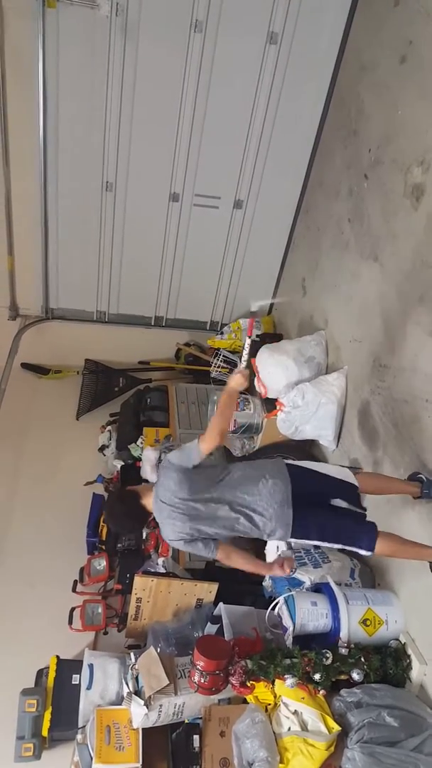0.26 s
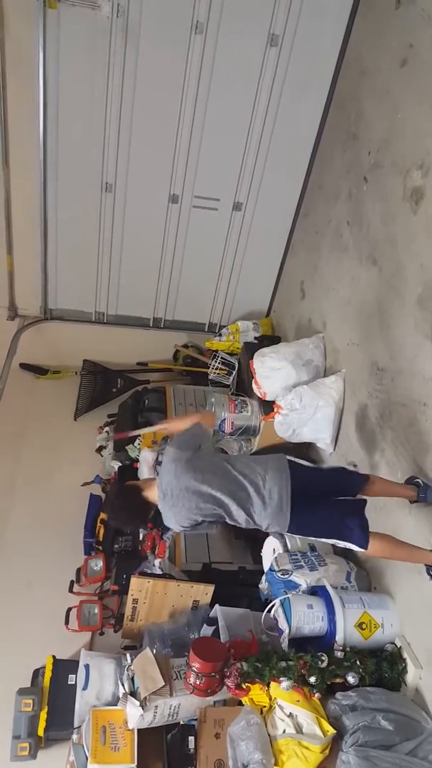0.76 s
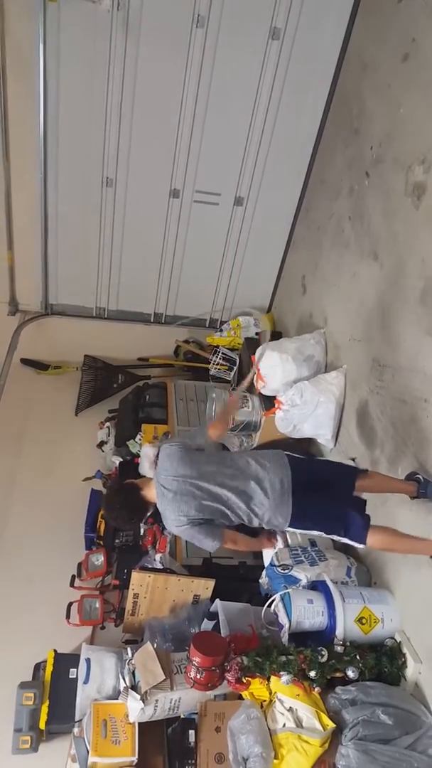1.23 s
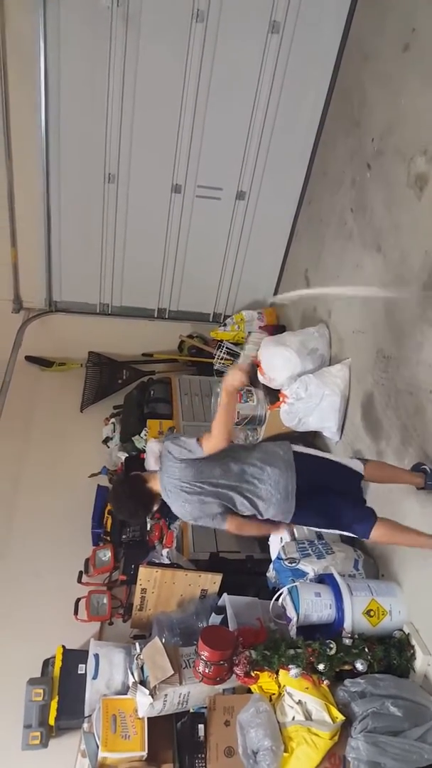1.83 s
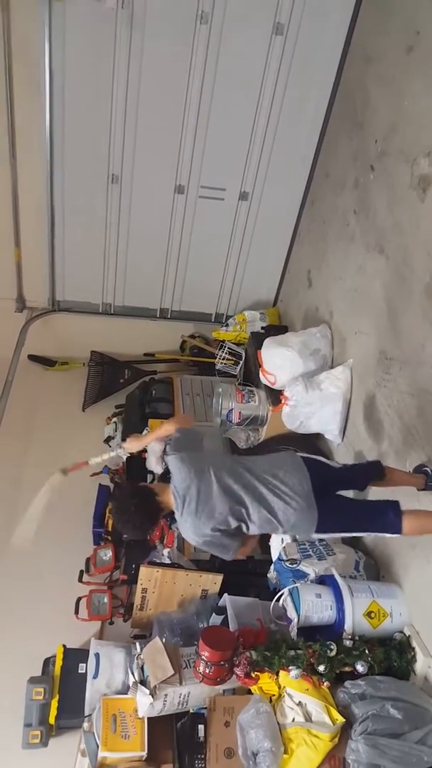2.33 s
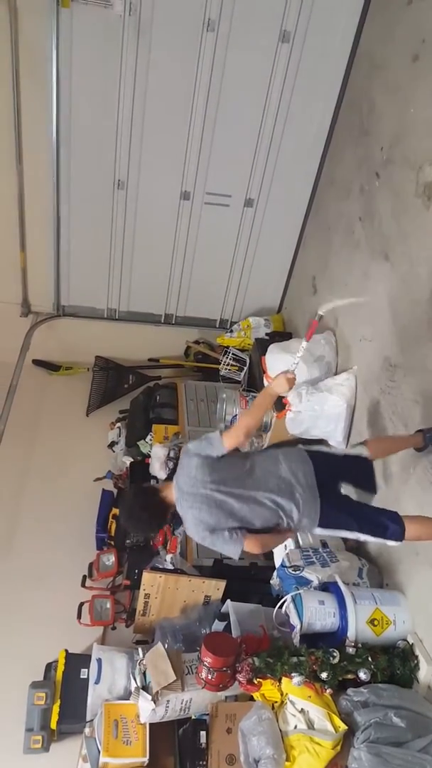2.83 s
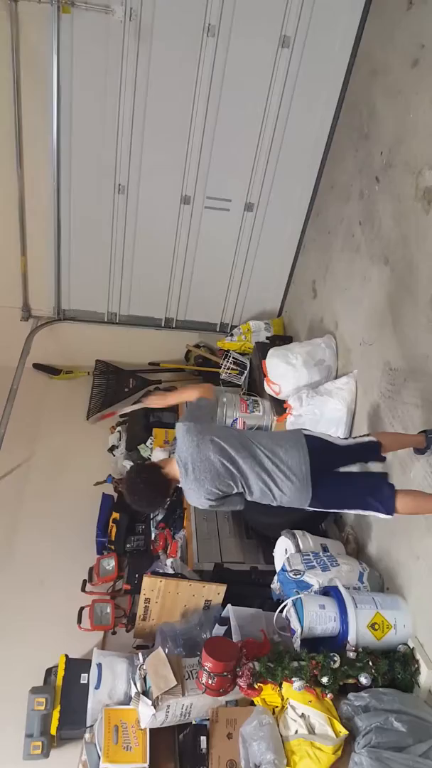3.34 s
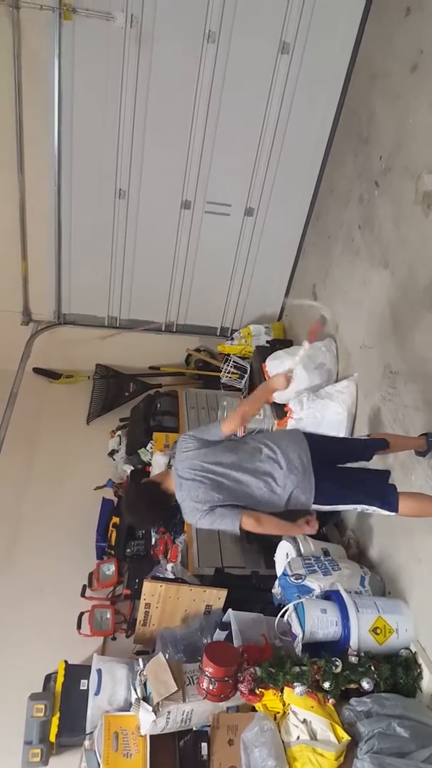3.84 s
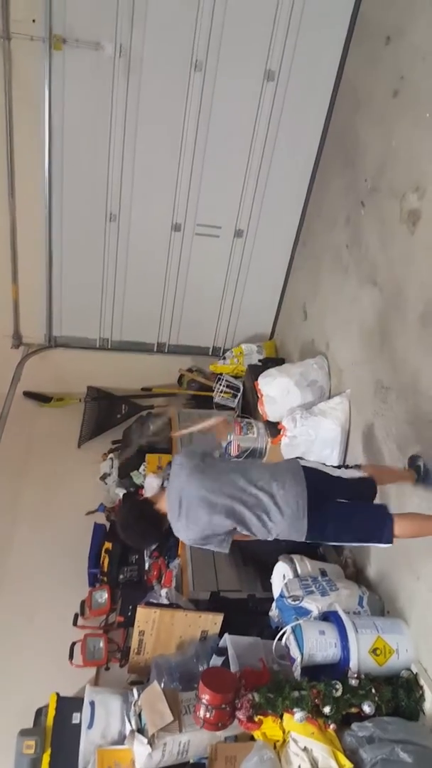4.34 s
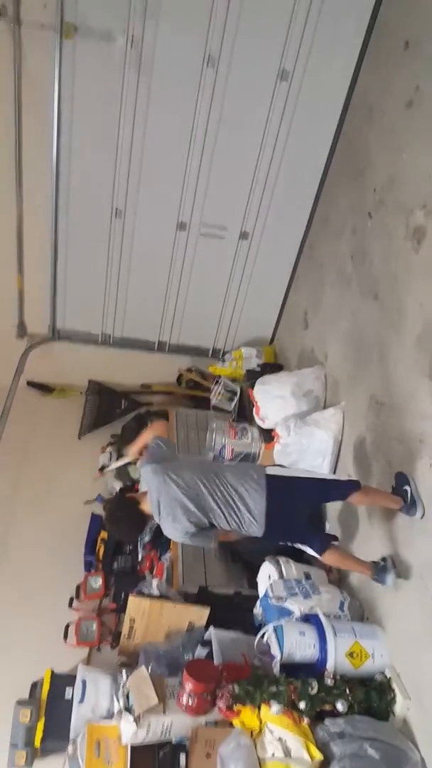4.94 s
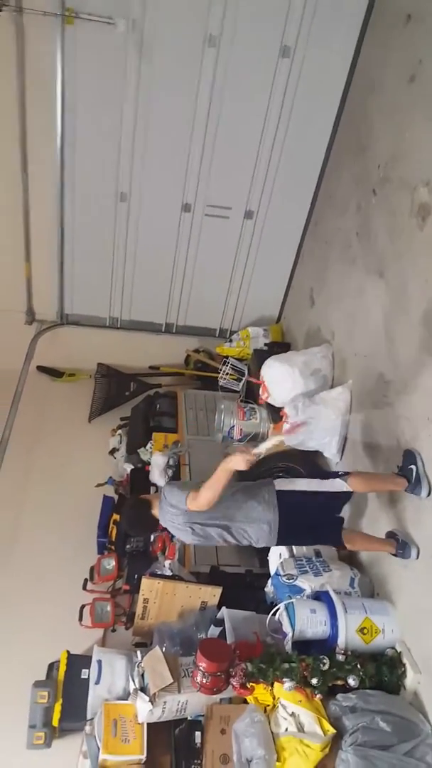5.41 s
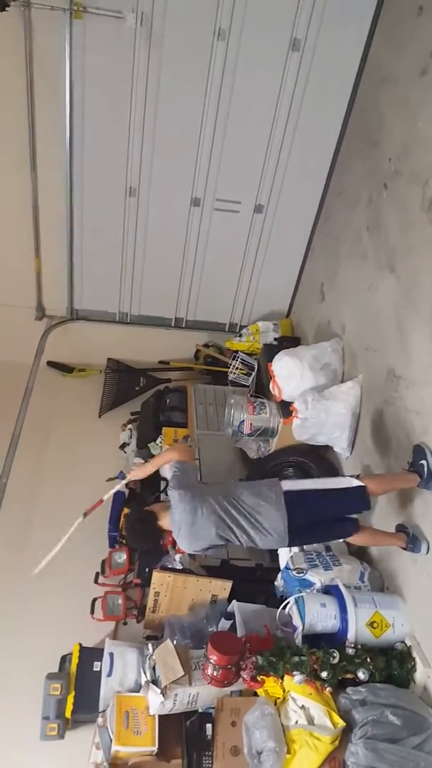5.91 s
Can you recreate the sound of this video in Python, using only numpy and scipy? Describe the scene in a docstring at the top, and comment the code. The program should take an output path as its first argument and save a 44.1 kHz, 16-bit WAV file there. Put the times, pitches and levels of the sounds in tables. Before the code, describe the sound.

The fading echo of an earlier crack and a faint room hush with low mains hum open the scene. A short whip swishes and snaps hard at 0.1 seconds, then continues evenly, roughly every 0.4 to 0.5 seconds: 0.55, 0.95, 1.4, 1.8, 2.2, 2.7, 3.1, 3.6, 4.05, 4.5, 4.95, 5.35 and 5.8. Strong, clean, piercing cracks stand out at 0.1, 0.95, 1.8, 4.5 and 5.35, the last strongest. Strokes at 0.55, 1.4, 2.7, 3.1 and 3.6 add a padded slap and thud on filled bags; 2.2, 4.05, 4.95 and 5.8 are weaker and duller. Near 2.4 the lash scrapes softly. Those at 3.1, 4.5 and 5.8 are very close doubles. Hard door and floor return dense echoes, decaying over about 0.7 seconds into the next stroke. The nearby phone microphone clips, adding a low rumbling punch.

```python
"""A short whip is cracked fourteen times in a closed garage, a few steps from a phone's two ports.
Each stroke swishes as noise, then snaps as a shaped pulse; on some the lash also thumps into filled bags,
as damped resonances. Bare door and floor throw the cracks back, as spaced echoes and a decaying noise tail.
The loudest cracks overload the microphone, and hush and a faint mains hum lie underneath."""
import sys
import numpy as np
from scipy import signal
from scipy.fft import rfft, irfft, next_fast_len
from scipy.io import wavfile
from scipy.ndimage import uniform_filter1d

SR = 44100
rng = np.random.default_rng(int(sys.argv[2]) if len(sys.argv) > 2 else 0)


def master_out(mix):
    """Clip the mix to full scale and print it as 16-bit PCM to the path in sys.argv[1]."""
    frames = np.transpose(np.atleast_2d(mix))
    ceiling = np.clip(frames, -1, 1)
    pcm = np.round(ceiling * 32767).astype(np.int16)
    wavfile.write(sys.argv[1], SR, pcm)


N = 272097  # length in samples
HZ = np.fft.rfftfreq(4096, 1 / SR)  # frequencies at which pulses are shaped

# Cracks of the tip; three strokes crack twice. Each row: time in seconds, strength in dB,
# brightness in dB per octave, ultrasound in dB.
CRACK_EVENTS = [(0.1212, 30.5, -0.65, 8.5), (0.5413, 22, 0.5, 11), (0.9655, 32, 1, 8),
                (1.3745, 25.5, -1.5, 14), (1.7800, 31, -0.3, 7), (2.1952, 13, 0.5, 10),
                (2.6889, 29, 0.26, -18), (3.1295, 22, -4, 0), (3.1351, 28, 2.33, -8), (3.5927, 31, 2, 9.5),
                (4.0513, 16, -0.5, 6), (4.4850, 31.5, 1.3, -4), (4.4995, 33.5, 2, -7), (4.938, 14.5, 2, 1),
                (5.3687, 35.5, 0.38, 9), (5.792, 3.5, 2.5, -2), (5.8062, 5, 3, -3)]
# Colour of the shock at the tip. Each row: frequency in Hz, level in dB.
SHOCK_COLOUR = [(40, -30), (100, -36), (165, -8.5), (300, -12), (500, -6.5), (1000, -4.5), (2200, -4),
                (4500, -3), (9000, -6.5), (16000, -13.5)]
# The lash landing on the bags. Each row: time in seconds, slap of the skin in dB, thud of the filling in dB.
THUMP_EVENTS = [(0.544, 32, 27), (1.3754, 30.5, 29.5), (2.1923, -5, 25), (2.6871, 33, 30.5),
                (3.1400, 26, 25.5), (3.5950, 26, 19.5), (4.0520, -9, 15.5), (4.9370, 26.5, 27),
                (5.807, 10, 16)]
# Colour of the air noise round the lash. Each row: frequency in Hz, level in dB.
AIR_COLOUR = [(60, -26), (200, -33), (600, -19.5), (1500, -21), (2500, -23.5), (5000, -23), (12000, -37.5)]
# Colour of the scrape on one backswing. Each row: frequency in Hz, level in dB.
BRUSH_COLOUR = [(150, -14), (500, -2), (1500, -7), (3500, -1.5), (6000, -4.5), (14000, -11.5)]
# Decay of the garage. Each row: frequency in Hz, time to fall by 60 dB in seconds.
GARAGE_DECAY = [(60, 0.49), (160, 0.5), (400, 0.56), (1000, 0.74), (2500, 0.7), (5000, 0.72), (8500, 0.62),
                (11000, 0.56), (16000, 0.28)]
# Direct sound, then floor, door and walls. Each row: delay in seconds,
# level in dB against the whole tail before its boost by nearby goods.
ECHO_PATHS = [(0, -7.5), (.0009, -13), (.0055, -17.5), (.0065, -10), (0.013, -12.5), (0.0145, -15),
              (0.0204, -11)]
# Likeness of diffuse sound at the two ports. Each row: frequency in Hz, correlation from -1 to 1.
PORT_LIKENESS = [(60, 0.8), (250, 1), (550, 0.87), (800, 0.57), (1200, 0.09), (2000, -.1), (3000, 0.04),
                 (16000, 0)]
# Standing waves of the garage. Each row: frequency in Hz, starting level in dB, time to fall by 60 dB in seconds.
STANDING_WAVES = [(173.3, -69.5, 0.99), (248, -68, 0.64), (382, -61.5, 0.84), (583, -71.5, 0.83),
                  (640, -77, 0.92), (853, -65, 0.45), (1840, -62, 0.87)]
# Colour of the room hush. Each row: frequency in Hz, level in dB.
HUSH_COLOUR = [(25, 1), (70, 14), (200, 8), (800, 17), (2000, -5), (6000, -55), (10000, -26), (16000, -30)]
# Mains hum ahead of the microphone. Each row: frequency in Hz, level in dB rms.
HUM_TONES = [(119, -62), (238, -63.5), (357, -75)]
# Low rumble of the overloaded microphone. Each row: frequency in Hz, level in dB.
RECOIL_COLOUR = [(25, -42), (50, -6), (90, -1), (220, -0.5), (420, 1), (800, -2.5), (2000, -34.5),
                 (8000, -54)]
# Response of the microphone. Each row: frequency in Hz, level in dB.
MICROPHONE_COLOUR = [(20, -17), (60, -5.5), (150, -0.5), (2200, 5.5), (3200, -1.5), (5500, -7.5),
                     (8500, -4), (9300, -9.5), (10200, -16), (12000, -9.5), (15500, -7)]

CLEAN_DB = 28  # strength of a clean crack
SLAP_PER_DB = 0.185  # dB of mid-range slap gained for each dB a crack lacks
SWISH_DB, SWISH_PER_DB = -49.5, -0.05  # air noise at a clean crack, and its change per dB of strength
WHISTLE_HZ, WHISTLE_DB, WHISTLE_S = 1900, -28, 0.0028  # centre pitch, level, half the duration
FLICK_LEAD_S, FLICK_DB, FLICK_TILT_DB = 0.0035, -24.5, -1.5  # lead, level re the crack, tilt per octave
SKIN_HZ, SKIN_WIDTH_HZ = 524, 237
FILLING_HZ, FILLING_WIDTH_HZ = 206, 95
BRUSH_AT_S, BRUSH_DB, BRUSH_S = 2.406, -18.5, 0.013  # start, level, decay constant
EDGE_HZ = 15700  # upper band limit


def amp(db):
    """Decibels to gain."""
    return 10 ** (np.asarray(db) / 20)


def read(points, hz):
    """A table joined by straight lines over log frequency."""
    f, value = np.transpose(points)
    return np.interp(np.log(hz + 1), np.log(f), value)


def add(mix, s, sound):
    """Adds a sound to both ports of the mix from time s on."""
    part = mix[:, max(round(s * SR), 0):][:, :sound.shape[1]]
    part += sound[:, :part.shape[1]]


def pulse(db):
    """The most compact causal (minimum-phase) pulse that has the spectrum db over HZ."""
    log_gain = np.log(amp(np.maximum(db, -100)))
    circle = np.concatenate([log_gain, log_gain[-2:0:-1]])
    spectrum = np.exp(np.conj(signal.hilbert(circle)))[:len(HZ)]
    return irfft(spectrum)[None]


def diffuse(size):
    """White noise from all sides: alike at both ports in the bass, unrelated in the treble."""
    a, b = rfft(rng.standard_normal((2, size)))
    same = np.clip(read(PORT_LIKENESS, np.fft.rfftfreq(size, 1 / SR)), -1, 1)
    second_port = same * a + np.sqrt(1 - same ** 2) * b
    return irfft(np.array([a, second_port]), size)


def noise(colour):
    """Diffuse noise of rms 1 with the given colour."""
    size = next_fast_len(N, True)
    gain = amp(read(colour, np.fft.rfftfreq(size, 1 / SR)))
    x = irfft(rfft(diffuse(size)) * gain, size)[:, :N]
    return x / x.std()


def cracks():
    """Each crack is a whistle, a light flick and the shock, all thrown back by the garage."""
    out = np.zeros((2, N))
    for s, db, tilt, ultra_db in CRACK_EVENTS:
        paths = garage()
        # the lash whistles at top speed, and a duller flick of the loop runs just ahead of the tip
        parts = [(2 * WHISTLE_S, whistle()),
                 (FLICK_LEAD_S, shock(db + FLICK_DB, FLICK_TILT_DB)),
                 (0, shock(db, tilt, ultra_db))]
        for lead_s, sound in parts:
            add(out, s - lead_s, signal.fftconvolve(sound, paths, axes=1))
    return out


def shock(db, tilt, ultra_db=0, pivot_hz=1400, slap_hz=1400, slap_octaves=0.95, ripple_db=1.72):
    """The tip passes the speed of sound: a shock, with more slap in it the weaker the crack."""
    octaves = np.log2(np.clip(HZ, 200, 8000) / pivot_hz)
    slap_shape = np.exp(-(np.log2((HZ + 1) / slap_hz) / slap_octaves) ** 2)
    slap = SLAP_PER_DB * (CLEAN_DB - db) * slap_shape
    # the steepest shocks reach beyond hearing, where they only load the microphone
    beyond = np.clip((HZ - 16000) / 2000, 0, 1)
    # the lash curls differently each time, which ripples the colour
    ripple = np.interp(HZ, np.linspace(0, SR / 2, 130), rng.standard_normal(130))
    colour = read(SHOCK_COLOUR, HZ) + tilt * octaves + slap + ultra_db * beyond + ripple_db * ripple
    return amp(db) * pulse(colour)


def whistle(spread=0.17):
    """A few cycles of tone that swell and fade, at a slightly different pitch for each crack."""
    t = np.arange(0, 2 * WHISTLE_S, 1 / SR)
    hz = WHISTLE_HZ * (1 + spread * rng.uniform(-1, 1))
    tone = np.hanning(len(t)) * np.sin(2 * np.pi * hz * t)
    return amp(WHISTLE_DB) * tone[None]


def garage(build_s=0.0015, near=0.098, near_s=0.14, clump_db=5.0, merge_s=0.073, flutter_db=0.5,
           stray_s=0.0003, port_lag_s=0.00008, spread=0.12, mottle_db=1.0, size=32768):
    """The paths from one spot to the two ports, as echoes on a decaying tail; each call is a new spot."""
    hz, t, z = signal.stft(diffuse(size), SR, nperseg=256)
    # the clutter returns some pitches more strongly than others, from moment to moment
    patches = uniform_filter1d(rng.standard_normal(z.shape), size=2, axis=0)
    patches = uniform_filter1d(patches, size=9, axis=1)
    z = z * amp(mottle_db * patches / patches.std())
    decay = amp(-60 * t / read(GARAGE_DECAY, hz)[:, None])
    tail = signal.istft(z * decay, SR)[1][:, :size]
    t = np.arange(size) / SR
    # early echoes come in separate clumps, then merge into a wash that still flutters a little
    clumps = np.interp(t, t[::48], rng.standard_normal(len(t[::48])))
    flutter = np.interp(t, t[::300], rng.standard_normal(len(t[::300])))
    tail *= amp(clump_db * np.exp(-t / merge_s) * np.tanh(clumps) + flutter_db * flutter)
    tail *= 1 - np.exp(-t / build_s)  # scattered echoes need a moment to gather
    tail /= np.linalg.norm(tail) / np.sqrt(2)
    tail *= 1 + near * np.exp(-t / near_s)  # the stacked goods close by scatter first
    for hz, db, t60 in STANDING_WAVES:
        turns = rng.random() + spread * rng.uniform(-1, 1, (2, 1))  # phase at each port
        tail += amp(db - 60 * t / t60) * np.sin(2 * np.pi * (hz * t + turns))
    for delay, db in ECHO_PATHS:
        # each reflection meets the ports from its own side; the direct sound does not stray
        stray = (delay > 0) * stray_s * rng.uniform(-1, 1, 2)
        arrival = delay + stray + np.array([port_lag_s, 0])
        tail[np.arange(2), np.round(abs(arrival) * SR).astype(int)] += amp(db)
    return tail


def thumps(give_s=0.0019, damp_s=1.0):
    """A bag gives way under the lash: its skin slaps, then its filling thuds; the pile soaks up some echo."""
    out = np.zeros((2, N))
    for s, skin_db, filling_db in THUMP_EVENTS:
        paths = garage()
        paths *= np.exp(-np.arange(paths.shape[1]) / SR / damp_s)
        slap = signal.fftconvolve(bag(SKIN_HZ, SKIN_WIDTH_HZ), paths, axes=1)
        thud = signal.fftconvolve(bag(FILLING_HZ, FILLING_WIDTH_HZ), paths, axes=1)
        add(out, s, amp(skin_db) * slap)
        add(out, s + give_s, amp(filling_db) * thud)
    return out


def bag(hz, width, low_hz=140, lumpy_db=2.5):
    """One heavily damped resonance with no deep bass, made lumpy by what lies under the blow."""
    f = HZ + 1
    body = 1 / (1 + ((f ** 2 - hz ** 2) / (f * width)) ** 2)
    soft = 1 / (1 + (f / (2 * hz)) ** 2) / (1 + (low_hz / f) ** 8)
    lumps = np.interp(HZ, HZ[::6], rng.standard_normal(len(HZ[::6])))
    return pulse(10 * np.log10(body * soft) + lumpy_db * lumps)


def swishes(rise_s=0.21, fall_s=0.048, rush=6.4, rush_s=0.0037):
    """Air noise swells as the arm swings, with a last rush as the loop runs out to the tip."""
    t = np.arange(N) / SR
    level = np.zeros(N)
    for s, db, _, _ in CRACK_EVENTS:
        away = abs(t - s)
        swing = np.exp(-away / np.where(t < s, rise_s, fall_s)) + rush * np.exp(-away / rush_s)
        swish_db = SWISH_DB + SWISH_PER_DB * (db - CLEAN_DB)
        level = np.maximum(level, amp(swish_db) * swing)
    return level * noise(AIR_COLOUR)


def brush():
    """On one backswing the slack lash brushes against something: a short soft noise scrape and its echo."""
    t = np.arange(0, 0.06, 1 / SR)
    grit = rng.standard_normal((1, len(t))) * np.exp(-t / BRUSH_S)
    scrape = signal.fftconvolve(grit, pulse(read(BRUSH_COLOUR, HZ)), axes=1)
    out = np.zeros((2, N))
    add(out, BRUSH_AT_S, amp(BRUSH_DB) * signal.fftconvolve(scrape, garage(), axes=1))
    return out


def background(hush_db=-58, echo_db=-42, echo_t60=1.0):
    """Room hush as steady noise, mains hum as sines, and the dying echo of an earlier crack."""
    t = np.arange(N) / SR
    hum = np.zeros(N)
    for hz, db in HUM_TONES:
        hum += np.sqrt(2) * amp(db) * np.sin(2 * np.pi * (hz * t + rng.random()))
    echo = amp(echo_db) * np.exp(-np.log(1000) * t / echo_t60) * noise(AIR_COLOUR)
    return amp(hush_db) * noise(HUSH_COLOUR) + hum + echo


def scene():
    """Everything that reaches the two ports."""
    return cracks() + thumps() + swishes() + brush() + background()


def overload(dry, push_db=0, pull_db=-2, slew_db=-5, recoil_db=-2, apart=0.53):
    """The microphone clips; slopes too steep for it are rectified into a low rumble, unlike at the two ports."""
    clipped = np.clip(dry, -amp(pull_db), amp(push_db))
    slope = abs(np.diff(dry, prepend=0))
    too_steep = np.tanh(np.maximum(slope / amp(slew_db) - 1, 0))
    too_steep = too_steep + apart * (too_steep - too_steep[::-1])  # widens the difference between ports
    rumble = signal.oaconvolve(too_steep, pulse(read(RECOIL_COLOUR, HZ)), axes=1)[:, :N]
    return clipped + amp(recoil_db) * rumble


def record(dry, limit_db=-15, recover_db_per_s=60, squeeze=0.38):
    """Overload, the microphone's colour, a gentle limiter and the band limit."""
    x = signal.oaconvolve(overload(dry), pulse(read(MICROPHONE_COLOUR, HZ)), axes=1)[:, :N]
    power = uniform_filter1d((x ** 2).mean(0), size=256, origin=127)
    power_db = 10 * np.log10(abs(power) + 1e-12)
    # the limiter follows each rise in level at once and recovers at a steady rate
    fall = np.arange(N) / SR * recover_db_per_s
    held_db = np.maximum.accumulate(power_db + fall) - fall
    over_db = np.maximum(held_db - limit_db, 0)
    x = np.clip(x * amp(-squeeze * over_db), -0.9, 0.9)
    edge = signal.firwin(301, EDGE_HZ, window=("kaiser", 8), fs=SR)
    return signal.oaconvolve(x, edge[None], "same", axes=1)


dry = scene()
out = record(dry)
master_out(out)
```